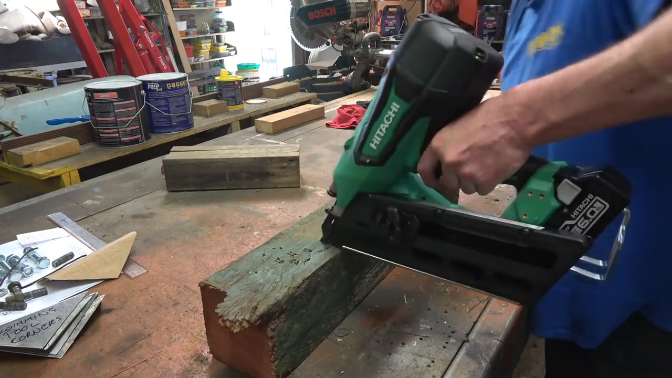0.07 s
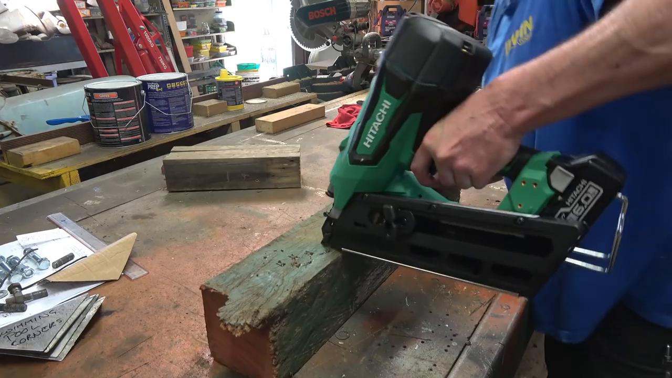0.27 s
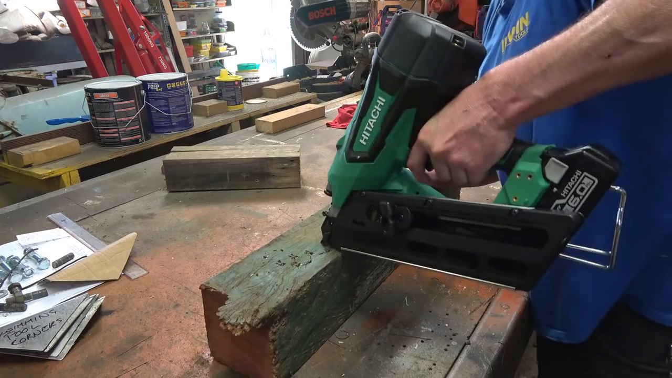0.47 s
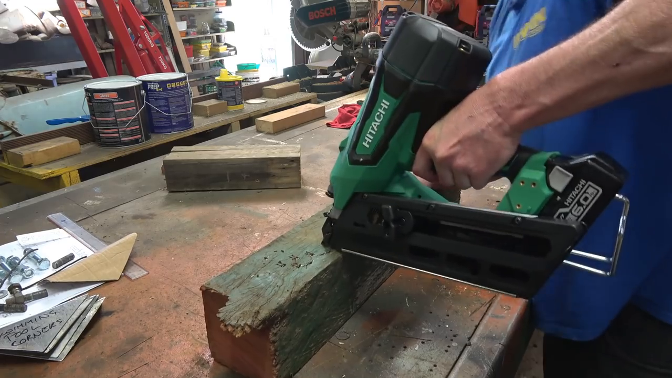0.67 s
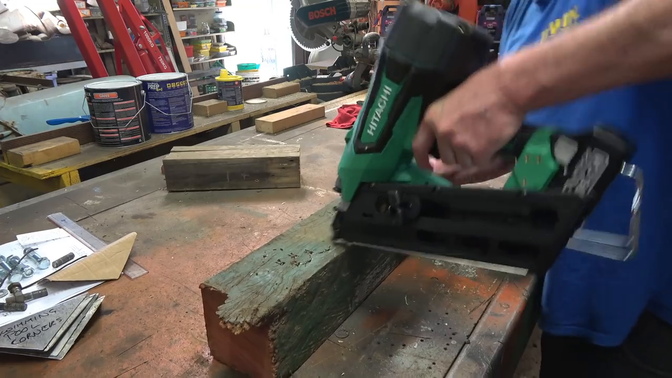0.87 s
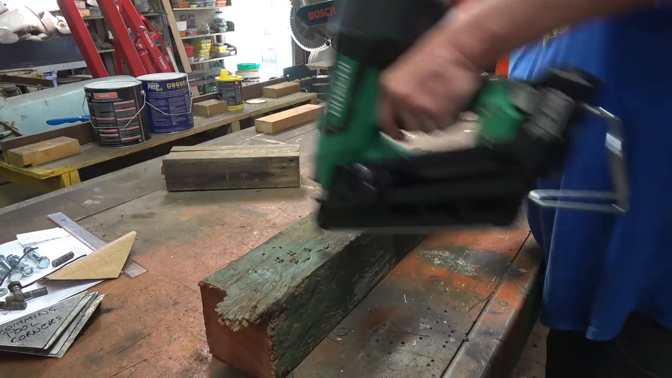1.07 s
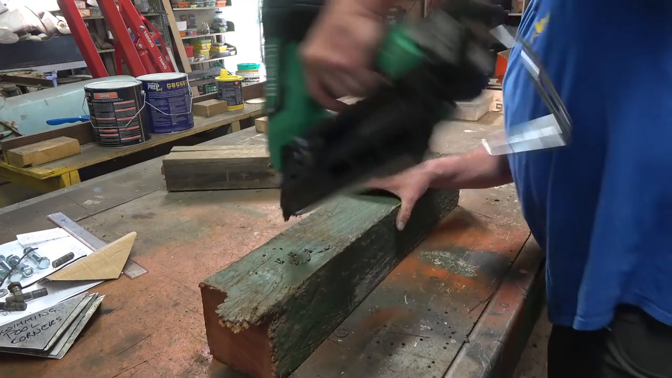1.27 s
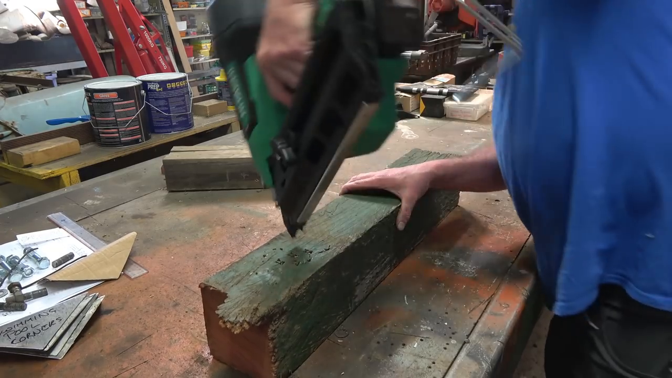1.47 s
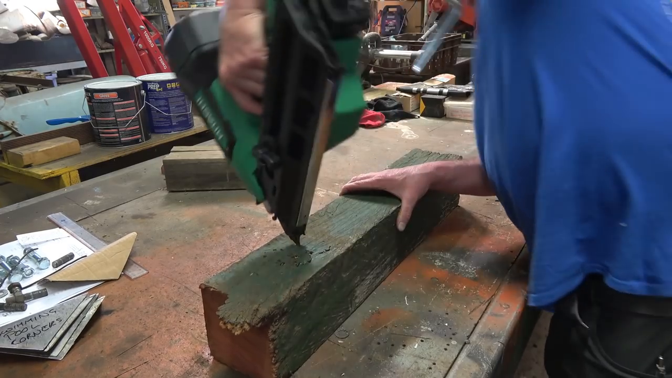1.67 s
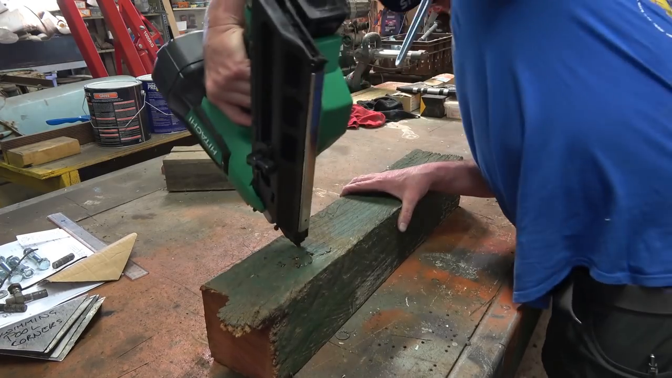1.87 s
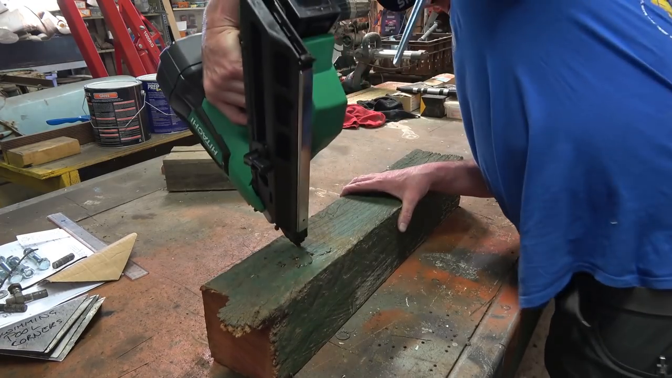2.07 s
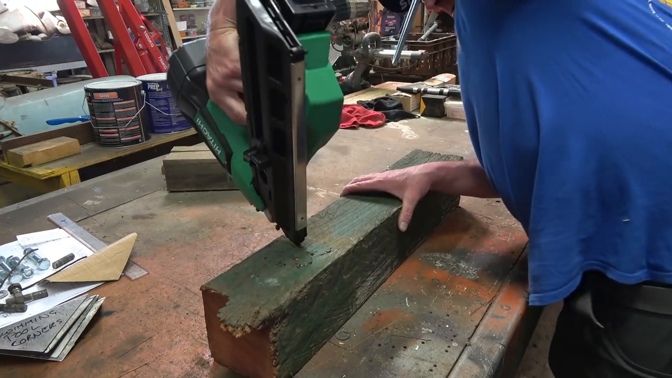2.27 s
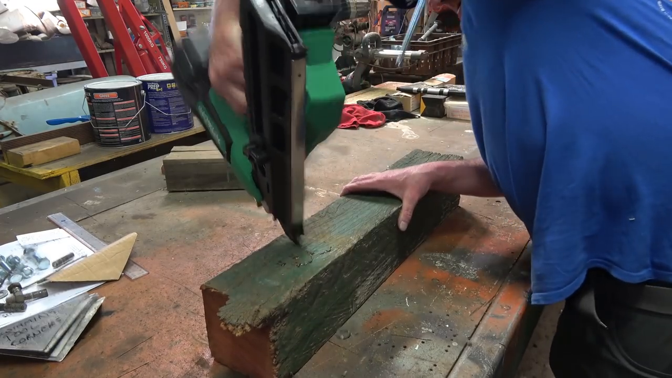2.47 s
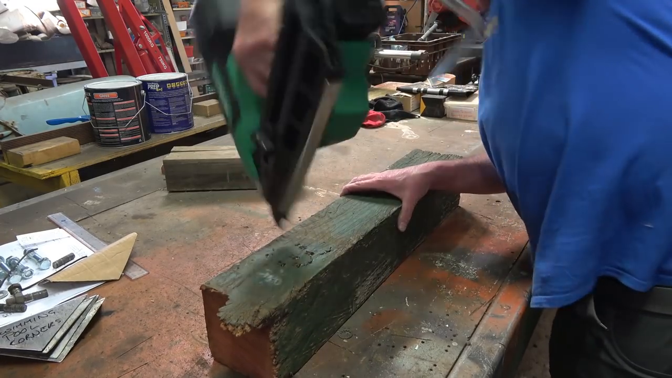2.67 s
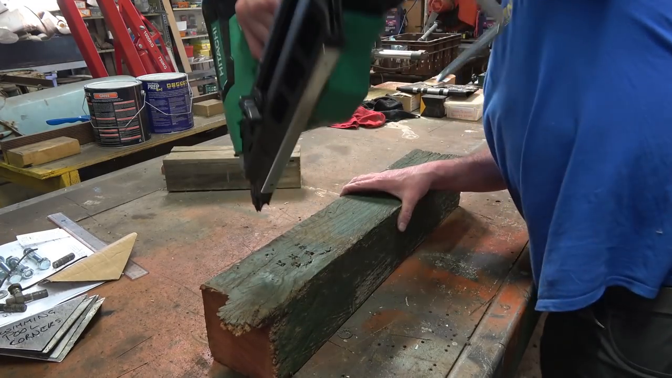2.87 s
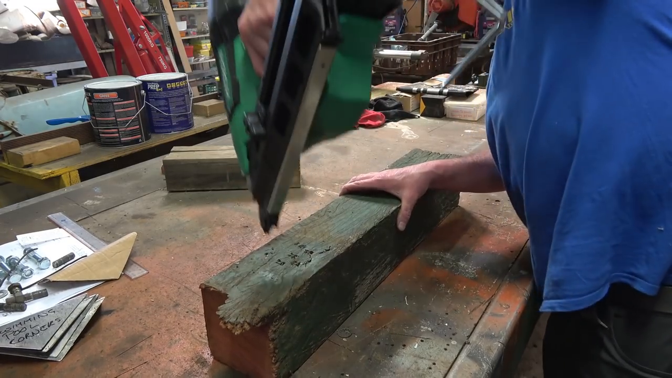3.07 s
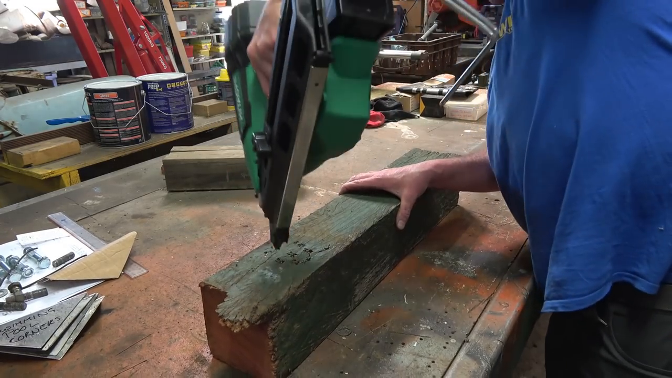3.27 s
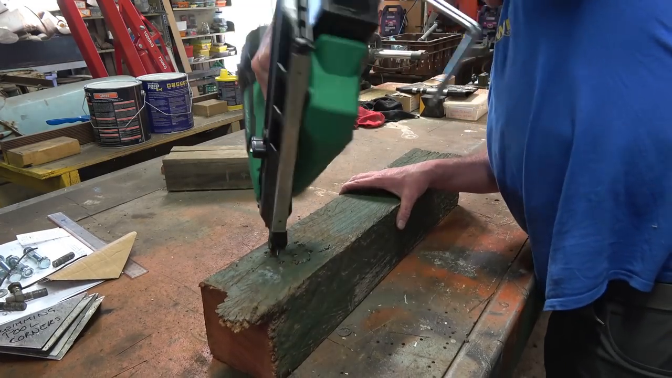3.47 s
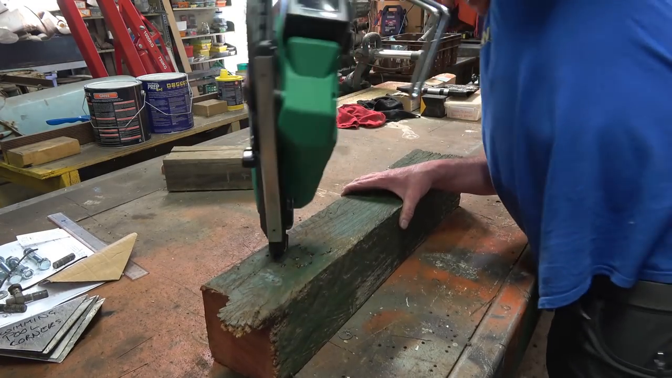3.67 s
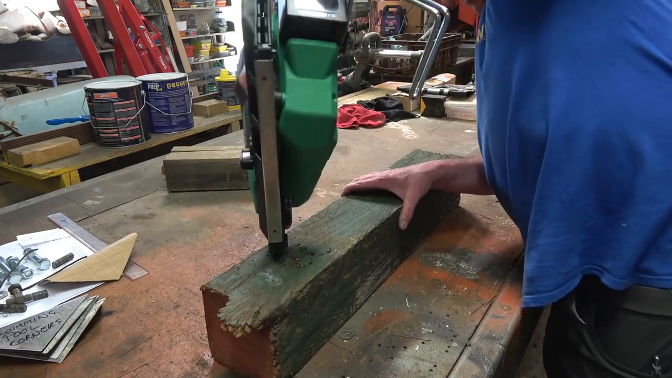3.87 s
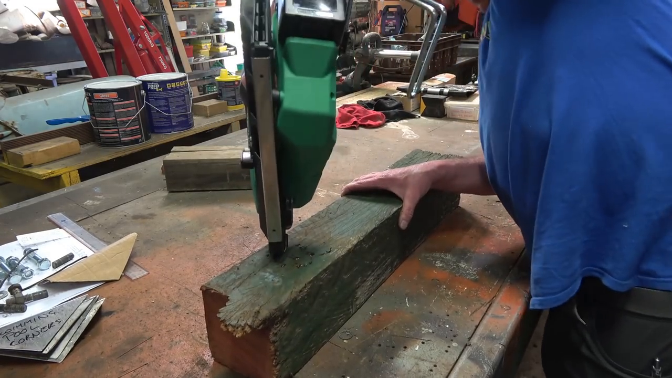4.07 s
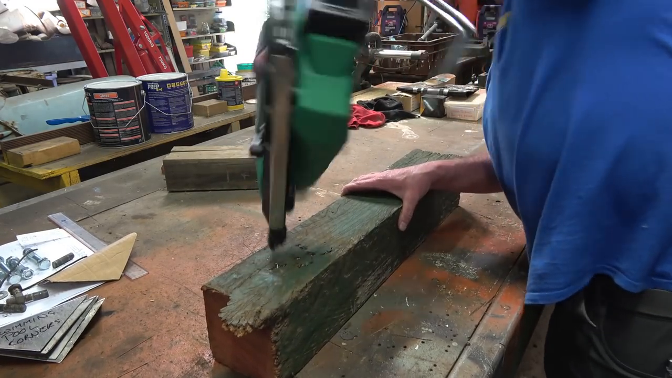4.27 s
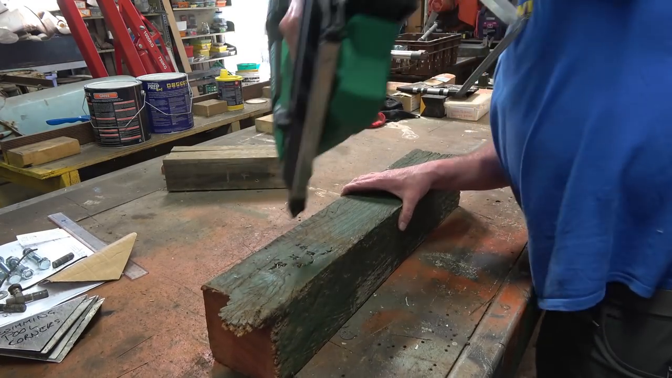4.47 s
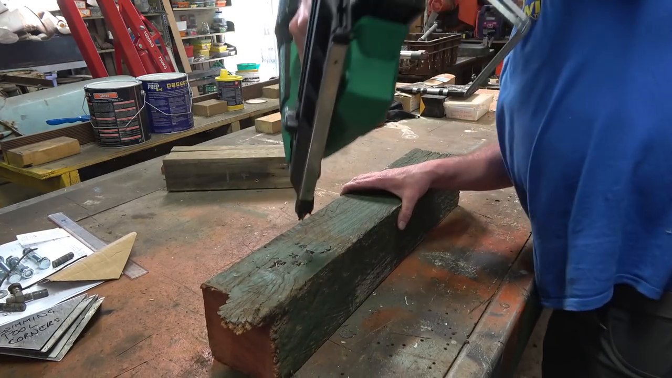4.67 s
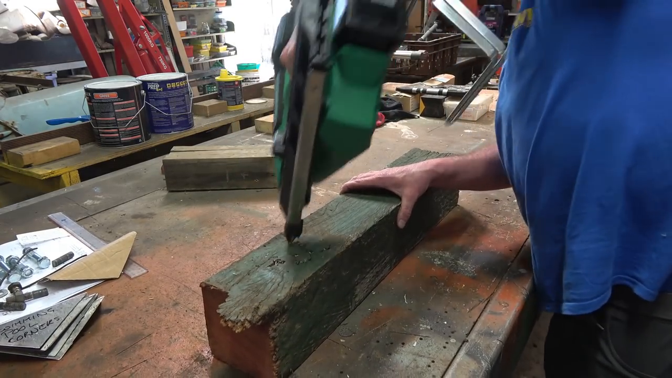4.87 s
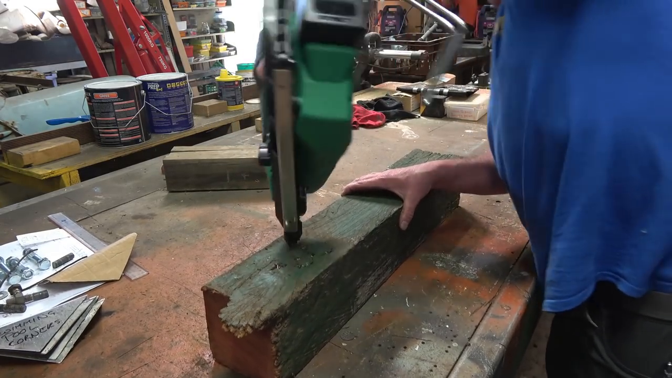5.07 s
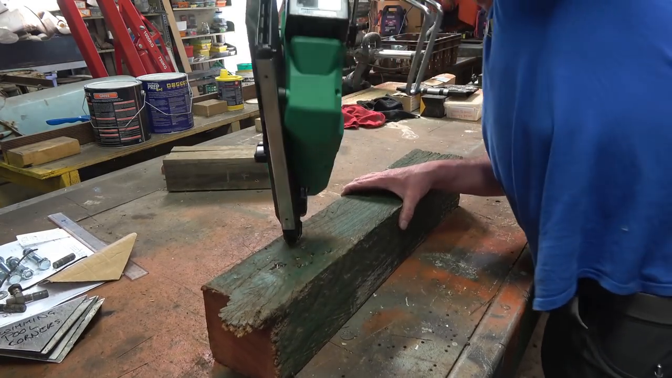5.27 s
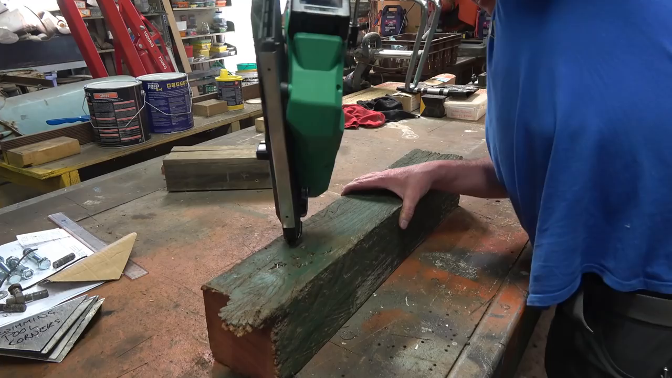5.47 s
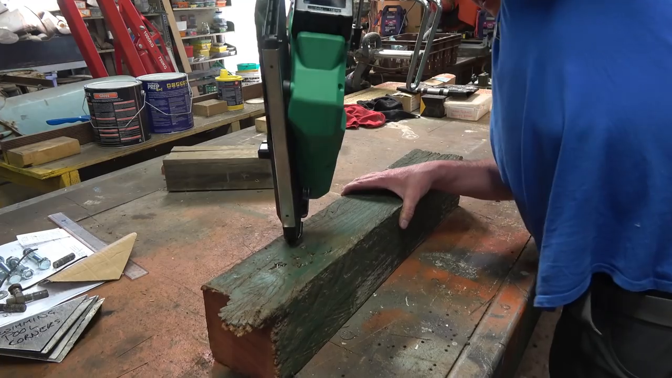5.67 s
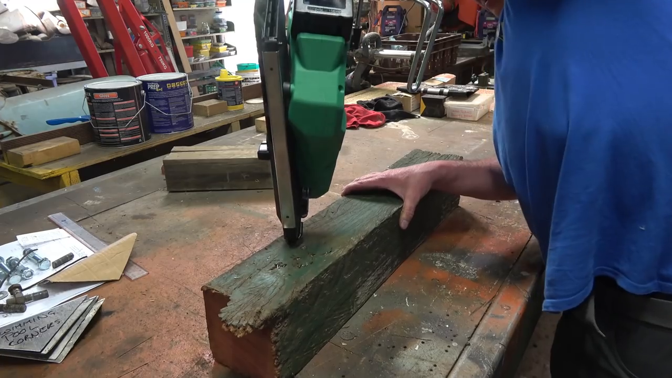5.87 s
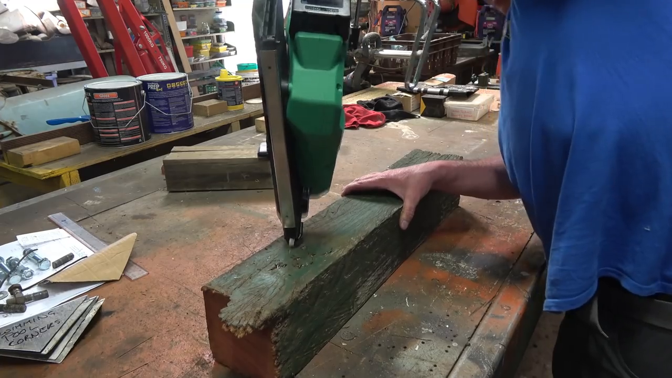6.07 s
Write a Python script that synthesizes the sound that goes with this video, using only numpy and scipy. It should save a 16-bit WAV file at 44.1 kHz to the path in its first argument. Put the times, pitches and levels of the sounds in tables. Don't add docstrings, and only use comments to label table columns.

```python
import sys
import numpy as np
from scipy import signal
from scipy.fft import rfft, irfft
from scipy.io import wavfile
from scipy.ndimage import uniform_filter1d, minimum_filter1d

SR = 44100
rng = np.random.default_rng(int(sys.argv[2]) if len(sys.argv) > 2 else 0)


def pcm_store(signal):
    levels = np.round(np.clip(np.atleast_2d(signal), -1, 1) * 32767)
    wavfile.write(sys.argv[1], SR, levels.astype(np.int16).T)


def undo_db(level):
    steps = np.asarray(level, float) / 20
    return 10 ** steps


N = 270222

# piston release t/s, clang level/dB, clang f/Hz, blow level/dB, motor run/s
SHOTS = [
    (2.3876, 1.5, 2616, 2.5, .417),
    (4.036, 2.5, 2460, 1, .414),
    (6.015, -2.5, 2560, 1, .415),
]
# f/Hz, level/dB, t60/s
BENCH_MODES = [(81.6, -11, .7), (109, 2, .36), (136, 3.5, .26), (160, 1, .3), (187.5, -2.5, .23),
               (224, -5, .25), (259, -6, .25), (317, -7, .22), (432, -12, .35), (636, -6, .4)]
BENCH_TOP_HZ = 107
STROKE_S = .0525


def evened(x):
    return x / np.sqrt(np.mean(x ** 2) + 1e-20)


def read(points, hz):
    f, value = np.transpose(points)
    return np.interp(np.log(hz + 1), np.log(f + 1), value)


def add(mix, s, sound):
    at = round(s * SR)
    sound = sound[max(-at, 0):]
    part = mix[max(at, 0):][:len(sound)]
    part += sound[:len(part)]


def coloured(x, spectrum):
    return irfft(rfft(x) * undo_db(read(spectrum, np.fft.rfftfreq(len(x), 1 / SR))), len(x))


def resonate(x, hz, width_hz):
    turn = np.exp(2j * np.pi * np.cumsum(hz * np.ones(len(x))) / SR)
    r = np.exp(-np.pi * width_hz / SR)
    return 2 * (turn * signal.lfilter([1 - r], [1, -r], x / turn)).real


def ring(modes, t, spread_db):
    hz, db, t60 = np.transpose(modes)[:, :, None]
    chance = rng.standard_normal((2, len(modes), 1))
    level = undo_db(db + spread_db * chance[0] - 60 * t / t60)
    return (level * np.sin(2 * np.pi * hz * (1 + .02 * chance[1]) * t)).sum(0)


def curve(rows):
    s, *columns = np.transpose(rows)
    t = np.arange(s[0], s[-1], 1 / SR)
    return s[0], *(np.interp(t, s, c) for c in columns)


def dying(t, db, t60, rise_s):
    t = np.maximum(t, 0)
    return (undo_db(db - 60 * t / t60) * (1 - np.exp(-(t / rise_s) ** 2))) ** 2


def patchy(x, depth_db):
    z = signal.stft(x, nperseg=256)[2]
    patches = rng.standard_normal(z.shape[::-1])
    patches = uniform_filter1d(uniform_filter1d(patches, 4, 0), 4, 1)
    return evened(signal.istft(z * undo_db(depth_db * evened(patches).T))[1][:len(x)])


def shop(x):
    # f/Hz, t60/s
    decay = [(60, 0.95), (250, 0.38), (1000, 0.52), (2500, 0.63), (6000, 0.56), (10000, 0.26),
             (15000, 0.28)]
    hz, t, z = signal.stft(rng.standard_normal((2, SR)), SR, nperseg=256)
    tail = signal.istft(z * undo_db(-60 * t / read(decay, hz)[:, None]), SR, nperseg=256)[1]
    tail *= np.clip(np.arange(tail.shape[1]) / SR / 0.0098, 0, 1) ** 2
    return signal.fftconvolve(x[None], tail / np.linalg.norm(tail[0]), axes=1)[:, :N]


def hush():
    # f/Hz, level/dB
    spectrum = [(18, -27), (30, 5.5), (659, -6), (953, -4.5), (1030, -7), (1150, -9.5), (2810, -13),
                (3860, -12.5), (14800, -32.5), (16500, -37)]
    return undo_db(-58.5) * np.array([evened(coloured(n, spectrum)) for n in rng.standard_normal((2, N))])


def snaps():
    # t/s, level/dB
    events = [
        (5.514, -46),
        (5.521, -39),
    ]
    out, t = np.zeros(N), np.arange(SR // 2) / SR
    for s, db in events:
        airy = 1.32 * resonate(resonate(rng.standard_normal(len(t)), 9000, 5900), 9000, 9000)
        add(out, s, undo_db(db) * airy * (1.4 * undo_db(-60 * t / 0.0064) + .5 * undo_db(-60 * t / 0.42)))
    return out


def focus_drive():
    # t/s, peak level/dB, f/Hz
    ticks = [(0.3038, -38, 7560), (0.3404, -42, 7240), (0.5921, -45, 7460), (1.1304, -57, 7980),
             (1.9871, -31, 7530), (2.091, -36.5, 10700), (2.169, -44, 10700), (2.2484, -42.5, 10700),
             (2.33, -36.5, 10900), (3.0752, -57, 7220), (3.1716, -49, 7300), (3.27, -46, 7530),
             (3.7762, -42, 14300), (3.7956, -42.5, 7460), (3.919, -45, 7360), (3.9752, -46, 12500),
             (.541, -48, 7500), (.698, -54, 7500), (4.7824, -74, 7540), (5.3657, -49, 10800),
             (5.735, -48, 7800)]
    # start t/s, end t/s, ends f/Hz, top f/Hz, level/dB
    moves = [
        (.17, .46, 12600, 14500, -64),
        (1.973, 2.293, 12600, 14300, -63),
        (3.801, 4.0, 11500, 12250, -62),
    ]
    out, t = np.zeros(N), np.arange(2000) / SR
    for s, db, hz in ticks:
        tick = resonate(rng.standard_normal(len(t)), 9500, 6000) * undo_db(-60 * t / 0.011)
        tone = np.sin(2 * np.pi * hz * t) * undo_db(-60 * t / 0.048)
        add(out, s, undo_db(db) * (.4 * tick + 0.31 * tone))
    for start, end, ends_hz, top_hz, db in moves:
        hz = ends_hz + (top_hz - ends_hz) * np.sin(np.linspace(0, np.pi, round((end - start) * SR)))
        noise = rng.standard_normal(SR // 2)[:len(hz)]
        add(out, start, undo_db(db - 11.5) * evened(resonate(noise, hz, 120)))
    return out


def rubbing():
    # start t/s, end t/s (if before the start, lasts .5 s less the gap), level/dB, start f/Hz, end
    # f/Hz
    whistles = [
        (.22, 0.497, -55, 3900, 3780),
        (5.255, 5.42, -52, 3820, 3780),
        (5.4, 5.47, -54, 3280, 3250),
        (5.85, 5.92, -46, 3770, 3610),
    ]
    lingers = [
        (4.49, 4.85, -48, 4000, 3900),
        (2.86, 3.25, -53, 760, 750),
        (4.52, 4.8, -53, 650, 640),
        (1.05, 1.45, -63, 4000, 3900),
        (2.05, 2.35, -55, 2420, 2400),
        (4.87, 4.98, -40, 2200, 2180),
    ]
    creaks = [(1.715, 1.769, -26, 2150, 2250), (1.705, 1.767, -29, 1100, 1310),
              (1.71, 1.773, -34.5, 650, 680), (1.99, 2.35, -43, 1780, 1714), (2.02, 2.353, -54, 5170, 5120),
              (2.0, 2.343, -55, 2600, 3370), (3.545, 3.598, -28, 1140, 1266),
              (3.545, 3.597, -30.5, 1697, 3040), (3.56, 3.598, -35.5, 3770, 3800),
              (5.245, 5.41, -52.5, 3900, 3830), (5.385, 5.52, -51, 2950, 2850),
              (5.835, 5.93, -47, 3830, 3600), (5.9, 6.005, -49.5, 3300, 3120)]
    rubs = [(0.38, 0.585, -51, 1940, 2400), (.49, 0.501, -35.5, 940, 1200),
            (.725, 0.777, -34.5, 1400, 1150), (0.95, 1.2, -53, 720, 830), (1.97, 1.9, -53, 3700, 6500),
            (4.955, 5.0, -43.5, 1870, 1900), (1.7, 1.772, -37.5, 5000, 7700),
            (3.55, 3.599, -37, 5000, 7500), (5.83, 6.0, -56, 3000, 2500), (5.26, 5, -61, 2800, 2600),
            (5.26, 5.7, -64, 3400, 3200), (.77, .86, -33.5, 1500, 1800), (.51, .62, -48, 1600, 2000)]
    swell, fade, ease = (.3, 0.93), (1, 0.29), (1, 0.58)
    out = np.zeros(N)
    kinds = (whistles, .022, ease), (lingers, .044, fade), (creaks, .17, swell), (rubs, .97, swell)
    for rows, share, ends in kinds:
        for start, end, db, start_hz, end_hz in rows:
            noise = rng.standard_normal(SR // 2)[:round((end - start) * SR)]
            hz = np.linspace(start_hz, end_hz, len(noise))
            width_hz = share * (start_hz + end_hz) / 2
            rub = patchy(resonate(resonate(noise, hz, width_hz), hz, 2 * width_hz), depth_db=0.5)
            shape = signal.windows.tukey(len(rub), .3) * np.linspace(*ends, len(rub))
            add(out, start, undo_db(db) * rub * shape)
    return out


def bench_working():
    # t/s, low creak level/dB, knocking body level/dB, t60/s
    loads = [(0.0, -16.5, -36, 0.47), (.11, -26, -56, 0.39), (.285, -28.5, -52, 0.78),
             (.33, -30, -39, 0.47), (.62, -42.5, -60.5, 1.1), (1.06, -39.5, -52.5, 0.46),
             (.765, -22.5, -23.5, 0.23), (1.509, -27.5, -22.5, 0.64), (1.755, -15.5, -22.5, 0.53),
             (1.97, -43.5, -33.5, 1.3), (2.46, -12.5, -11, 1), (3.36, -25.5, -42, 1.4),
             (3.59, -15.5, -40.5, 0.6), (3.86, -30.5, -53, 1.9), (4.1, -13.5, -14, .75),
             (4.87, -21.5, -33.5, 0.64), (4.98, -24.5, -27, 0.99), (5.5, -44.5, -57, 2.1),
             (5.71, -37.5, -45, 1.04), (5.86, -38.5, -59, 2.6), (6.06, -18.5, -15, 1.6)]
    rise_s, knock_faster, rest_db = 0.017, 1.15, -59
    t, noise = np.arange(N) / SR, rng.standard_normal(N)
    rest = undo_db(2 * rest_db)
    low = np.sqrt(rest + sum(dying(t - s, db, t60, rise_s) for s, db, _, t60 in loads))
    body = np.sqrt(rest + sum(dying(t - s, db, t60 / knock_faster, rise_s) for s, _, db, t60 in loads))
    knocking = patchy(resonate(resonate(noise[::-1], 340, 480), 380, 780), depth_db=3.0)
    creak = undo_db(12) * resonate(noise, BENCH_TOP_HZ, 25)
    creak = creak + sum(undo_db(1.5 * level) * resonate(noise, hz, 50) for hz, level, _ in BENCH_MODES)
    return body * undo_db(-3) * knocking + low * undo_db(-6.5) * evened(creak)


def sways():
    # t/s, peak level/dB, f/Hz, t60/s
    swings = [(.01, -26, 112.9, 0.63), (0.106, -24.5, 114.8, 0.39), (.45, -43, 114, 0.5),
              (.6, -43, 113, 1.1), (0.771, -23, 112, 0.31), (1.53, -26, 110, .6), (1.61, -25, 112.6, 0.43),
              (1.821, -25, 113.4, 0.65), (1.9, -33.5, 112.4, 0.77), (2.03, -38, 112.8, 0.79),
              (2.47, -11.5, 165.3, .25), (2.5, -14, 115.3, 0.53), (2.55, -16, 135.6, 0.78),
              (2.5, -27, 79.9, 0.95), (3.37, -30, 120, .5), (3.43, -28, 115, 0.49),
              (3.61, -22.5, 108.3, 0.39), (3.705, -26.5, 109.4, 0.53), (4.101, -17.5, 107.6, .6),
              (4.15, -13.5, 150.6, 0.46), (4.88, -27, 112.4, 0.45), (5.0, -23, 109.7, 0.55),
              (5.19, -34, 112.1, 0.43), (5.39, -47, 107.2, .6), (5.74, -42, 109, 0.67),
              (5.88, -45, 109.6, 1.4), (.31, -40.5, 251, .4), (1.775, -28, 311, .3), (2.45, -18, 199.6, .4),
              (4.0, -37.5, 110, .8), (5.75, -48, 255, 0.55)]
    out, t = np.zeros(N), np.arange(SR // 2) / SR
    for s, db, hz, t60 in swings:
        level = np.sqrt(dying(t, db, t60, rise_s=0.013))
        add(out, s, level * np.sin(2 * np.pi * hz * t) * np.minimum(10 - 20 * t, 1))
    return out


def boom(db, hz, t, rise_s):
    modes = []
    for f, level, t60 in BENCH_MODES:
        octaves = np.log2(f / hz)
        modes.append((f, level - 9 * octaves ** 2 / (1 + abs(octaves)), t60))
    low = ring(modes + [(hz, 8, .12)], t, spread_db=0.5) * (1 - np.exp(-(t / rise_s) ** 2))
    return -undo_db(db) * low / np.sqrt(np.mean(low[:2000] ** 2))


def pings():
    # t/s, peak level/dB, f/Hz, t60/s
    contacts = [(.0001, -15, 1100, 0.021), (.0060, -12, 6270, 0.012), (.0064, -19, 2700, 0.012),
                (0.018, -7.5, 1905, 0.0094), (.018, -19, 5500, .015), (.5034, -29, 10000, 0.012),
                (0.5073, -13, 2120, 0.0087), (.5085, -22.5, 2740, 0.017), (.7572, -25, 4800, .015),
                (.7662, -10, 2200, 0.023), (0.7672, -9.5, 3000, .02), (0.7674, -15, 5510, .02),
                (.819, -18, 2300, .02), (.8755, -24.5, 2030, 0.017), (1.5224, -5.5, 2097, 0.013),
                (1.522, -9.5, 6530, 0.017), (1.5253, -11, 2700, 0.017), (1.5254, -13, 4930, .015),
                (1.536, -13, 2110, 0.016), (1.6095, -11, 2680, 0.015), (1.633, -24, 6470, 0.014),
                (1.7708, -5.5, 3580, 0.0088), (1.7742, -9.5, 2300, .015), (1.772, -17.5, 8050, 0.018),
                (2.374, -13.5, 2420, .018), (2.381, -19.5, 3980, 0.013), (2.422, -9.5, 4800, .012),
                (3.3637, -17.5, 2200, 0.018), (3.3667, -12.5, 2040, 0.016), (3.3682, -10, 2300, 0.011),
                (3.367, -8, 5290, 0.013), (3.3722, -15, 8600, .012), (3.431, -14.5, 2610, 0.015),
                (3.5967, -10.5, 2750, 0.01), (3.5964, -10.5, 6250, 0.013), (3.599, -8.5, 9940, 0.015),
                (3.599, -15, 8100, 0.019), (4.025, -20, 2200, 0.016), (4.033, -21, 10100, 0.038),
                (4.0715, -5.5, 3850, .015), (4.083, -8, 4330, .012), (4.8605, -9.5, 2270, 0.014),
                (4.863, -16.5, 1150, 0.028), (4.875, -30, 1130, .2), (4.875, -32, 2200, .2),
                (1.633, -21, 8200, 0.011), (4.8613, -10, 6520, 0.016), (4.862, -11, 8720, 0.019),
                (4.865, -10.5, 8100, 0.012), (1.4943, -47, 2200, 0.013), (3.387, -22.5, 1263, 0.052),
                (3.459, -24, 1203, 0.063), (3.4575, -18, 7800, .012)]
    out, t = np.zeros(N), np.arange(3000) / SR
    for s, db, hz, t60 in contacts:
        level = undo_db(db + 3.5 - 60 * t / t60) * (1 - np.exp(-t / 0.00029))
        add(out, s, level * np.sin(2 * np.pi * hz * t))
    return out


def jolt(t, s, t60):
    return np.where(t > s, undo_db(-60 * abs(t - s) / t60), undo_db(-60 * abs(t - s) / 0.0025))


def clack(ring_db, ring_hz, crack_db, t, chatter):
    # f/Hz, level/dB
    spectrum = [(180, -36.5), (300, -16), (531, -6.5), (1170, -2.5), (1550, -1), (2240, 0.5), (3590, -2.5),
                (4930, -6.5), (8580, -4.5), (15200, -21), (16500, -43)]
    # f/Hz, width/Hz, level/dB
    magazine = [(1218, 46, -1.5), (2200, 98, 1.5), (3600, 680, -15.5), (5400, 1000, -3), (7460, 790, -18)]
    noise, share_db = rng.standard_normal((2, len(t))), 2 * rng.standard_normal(len(magazine))
    blow = 0.04 * jolt(t, 0.002, 0.013) + 0.62 * jolt(t, 0.00447, 0.011)
    blow = blow + 0.41 * jolt(t, 0.00628, 0.0073) + 0.33 * jolt(t, .009, 0.0088)
    width_hz = 110 * (ring_hz / 1000) ** 2.2
    tone = resonate(resonate(noise[0] * blow, ring_hz, width_hz), ring_hz, 1700)
    hiss = evened(coloured(noise[1], spectrum))
    body = 0
    for (hz, width_hz, db), share in zip(magazine, share_db):
        body = body + undo_db(db + share + 3.0) * resonate(hiss * blow, hz, width_hz)
    loose = chatter * (jolt(t, 0.0047, 0.12) + 0.52 * jolt(t, 0.012, 0.51))
    crack = hiss * (blow + loose) + body
    return undo_db(ring_db - 6.5) * tone / abs(tone).max() + undo_db(crack_db + 6.0) * crack


def clacks():
    # t/s, ring peak level/dB, ring f/Hz, crack level/dB, boom level/dB
    landings = [
        (-.003, -8, 1100, -10, -32.5),
        (0.006, -28, 2860, -21, -33),
        (1.522, -15, 2100, -9.5, -29),
        (1.7708, -5, 3400, -12.5, -12),
        (4.861, -15.5, 1130, -17.5, -33),
        (4.999, -23, 2120, -18, -17.5),
    ]
    knocks = [(0.018, -8.5, 1250, -16, -21.5), (0.289, -44, 1950, -50, -35.5),
              (0.507, -21, 1900, -36.5, -51), (0.766, -8, 2230, -15.5, -29.5),
              (0.79, -12.5, 1300, -27.5, -41), (0.818, -19, 2440, -30.5, -58),
              (0.876, -23, 2150, -53, -67.5), (1.059, -40, 990, -57, -50), (1.535, -11, 1280, -17, -26),
              (1.61, -14, 2750, -25.5, -33.5), (1.633, -21.5, 1290, -24, -31.5),
              (3.367, -8.5, 1250, -16, -28.5), (3.43, -18.5, 2660, -25, -30.5),
              (3.457, -20, 1183, -27.5, -44), (3.596, -7, 1550, -14, -22.5),
              (3.703, -25.5, 3470, -48, -25.5), (4.885, -14, 1230, -27, -31.5),
              (5.394, -45, 1020, -63, -54.5), (5.726, -58, 1015, -64, -38)]
    # t/s, ring peak level/dB, ring f/Hz, crack level/dB
    clicks = [(.73, -33, 1500, -66), (0.757, -16, 2200, -43), (1.494, -43, 800, -51),
              (2.352, -21, 1900, -50), (2.362, -16.5, 1520, -43), (2.375, -12, 2420, -23.5),
              (2.384, -10.5, 2400, -26), (4.001, -18.5, 1800, -56.5), (4.006, -20, 1900, -41),
              (4.018, -20, 2460, -37), (4.025, -12, 2200, -36.5), (4.031, -14.5, 2480, -23),
              (2.8, -7, 2100, -16), (4.462, -11, 2500, -22.5), (5.117, -50, 7880, -47),
              (5.271, -54.5, 6990, -57), (5.293, -55, 6450, -56), (5.983, -28, 1300, -53),
              (5.999, -20, 2980, -57), (6.008, -9, 2200, -30.5)]
    beam_hz = 161
    out, t = np.zeros(N), np.arange(SR // 2) / SR
    heavy = sorted([(*row, beam_hz) for row in landings] + [(*row, BENCH_TOP_HZ) for row in knocks])
    for s, ring_db, ring_hz, crack_db, boom_db, boom_hz in heavy:
        add(out, s - .004, clack(ring_db, ring_hz, crack_db, t, chatter=0.095))
        add(out, s, boom(boom_db - 0.5, boom_hz, t, rise_s=0.0052))
    for s, *voice in clicks:
        add(out, s - .004, clack(*voice, t[:4000], chatter=0.046))
    return out


def motor():
    # f/Hz, level/dB
    rattle_spectrum = [(710, -25), (1150, -3), (1550, -8), (2250, -3), (3120, -5.5), (4140, -5.5),
                       (5160, -7.5), (8550, -11), (14000, -22), (16000, -28), (16500, -66.5)]
    # f/Hz, level/dB
    rumble_spectrum = [(120, -16.5), (200, -1.5), (395, 0.5), (497, -2), (731, 3.5), (824, 1), (1800, -9.5),
                       (2340, -42), (3960, -120)]
    # f/Hz, width/Hz, level/dB
    panels = [(2900, 570, -10.5), (4800, 330, -21.5), (7800, 350, -15.5), (9200, 230, -21.5)]
    stop_s, stop_db = .026, -8.5
    recoil_s, recoil_db = 0.0055, -3
    out, t = np.zeros(N), np.arange(SR // 2) / SR
    for s, _, _, blow_db, length in SHOTS:
        running = undo_db(stop_db * np.maximum(t - length, 0) / stop_s)
        running = running * np.clip((length + stop_s - t) / .004, 0, 1)
        kick = dying(t, -11.5, 0.64, 0.0015)
        steady = dying(t, -18 + 2.5 * t, 99, .004)
        shaken = dying(t - STROKE_S / 2, -8 + blow_db / 2, 0.45, 0.014)
        rattle = np.sqrt(kick + steady + shaken)
        rumble = np.sqrt(dying(t - STROKE_S, -5.5, 0.56, 0.0014) + dying(t, -29.5, 99, 0.005))
        rattle = rattle * undo_db(recoil_db * np.exp(-((t - STROKE_S + recoil_s / 2) / recoil_s) ** 2))
        noise = rng.standard_normal((3, len(t)))
        bursts_db = 3.33 * evened(uniform_filter1d(uniform_filter1d(noise[2], 90), 90))
        shake = rattle * undo_db(bursts_db) * patchy(coloured(noise[0], rattle_spectrum), depth_db=2.5)
        buzz = sum(undo_db(db) * evened(resonate(noise[1], hz, width_hz)) for hz, width_hz, db in panels)
        shake += rattle * patchy(buzz, depth_db=3.5) * buzz.std()
        shake += rattle * undo_db(-22.5 + 50 * t) * evened(resonate(noise[2], 2500, 120))
        shake += rumble * evened(coloured(noise[1], rumble_spectrum))
        add(out, s, shake * running)
    return out


def whine():
    orders = (20, 19, 10, 38, 57, 80, 76, 95, 114, 23, 11)
    # f/Hz, width below/Hz, width above/Hz, level/dB
    case = [(2383, 55, 72, -10), (2150, 110, 46, -23), (1100, 53, 62, -22), (4050, 200, 180, -21.5),
            (6440, 590, 150, -21.5), (8900, 290, 155, -29), (8100, 300, 300, -34), (10330, 370, 300, -38.5),
            (12340, 400, 300, -36), (2670, 69, 60, -23.5), (1236, 50, 40, -32.5)]
    # t after release/s, speed/(turns/s)
    sag = [(.095, 134), (.115, 130), (.15, 125.6), (.22, 120), (.33, 111.6), (.43, 101.5)]
    # start t/s, trims of mesh/dB, half-mesh/dB, order 38/dB, orders from 57 up and the rest/dB
    windings = [
        (2.399, -1, -1.5, 0, -2.5),
        (4.036, 0.5, -4, -13.5, -1.5),
    ]
    out = np.zeros(N)
    for released, mesh_db, half_db, mid_db, high_db in windings:
        s, hz = curve(sag)
        trims_db = mesh_db, mesh_db, half_db, mid_db, *[high_db] * 7
        wobble = evened(uniform_filter1d(rng.standard_normal((2, SR // 2)), 250))[:, :len(hz)]
        load = np.linspace(0, 1, len(hz)) ** 3
        turns = np.cumsum(hz * (1 + (0.0004 + 0.018 * load) * wobble[0])) / SR
        lines = 0
        for k, (ring_hz, below, above, db), trim_db in zip(orders, case, trims_db):
            off = (k * hz - ring_hz) / np.where(k * hz < ring_hz, below, above)
            level = undo_db(db + trim_db + 4.5) / (1 + off ** 2) ** (0.61 if k < 30 else 1.1)
            lines = lines + level * np.sin(2 * np.pi * k * turns)
        beat = 1 + load * np.cos(2 * np.pi * turns)
        flutter = undo_db(np.linspace(.4, 3.5, len(hz)) * wobble[1])
        add(out, released + s, lines * beat * flutter * signal.windows.tukey(len(hz), .06))
    return out


def shots():
    out, t = np.zeros(N), np.arange(SR // 2) / SR
    for released, clang_db, clang_hz, blow_db, _ in SHOTS:
        struck = released + STROKE_S
        noise = rng.standard_normal((3, len(t)))
        clang = resonate(resonate(noise[0], clang_hz, 230), clang_hz, 900)
        clang = clang * undo_db(-60 * t / 0.092) * (1 - np.exp(-t / 0.01))
        add(out, released, undo_db(clang_db) * clang / clang[:900].std() / 3)
        crack = signal.lfilter([1, -.7], 1, noise[1]) * undo_db(-5.0 - 60 * t / 0.028)
        add(out, struck, undo_db(blow_db) * crack + boom(blow_db - 13.5, 165, t, rise_s=0.0088))
        shudder = evened(resonate(resonate(noise[2], 175, 80), 190, 190))
        hop = undo_db(blow_db - 9.0 - 60 * t / 0.43) * (1 - np.exp(-(t / 0.035) ** 2))
        add(out, struck, hop * shudder)
        add(out, struck + 0.016, undo_db(blow_db - 8.5) * crack)
    return out


def scene():
    # f/Hz, level/dB
    lean = [(60, -1), (99, 3.5), (160, 4.5), (270, 0.5), (450, -3.5), (740, -2), (1220, 0.5), (2010, 1.5),
            (3330, 1.5), (5500, 1.5), (9080, 2), (15000, 2.5)]
    # f/Hz, phase/rad
    lead = [(0, 0.013), (16200, 0.0022)]
    # f/Hz, level/dB
    wide = [(40, -33), (300, -10.5), (1500, -16.5), (3500, -29.5), (5500, -6), (9000, 0.5), (11500, 1),
            (16000, -35.5)]
    contacts, lines = pings(), whine()
    tool = clacks() + shots() + motor() + sways() + rubbing() + bench_working()
    wet, other = shop(tool + .25 * contacts + .45 * lines)
    floor = hush()
    mid = undo_db(-4.0) * (tool + contacts + lines) + undo_db(-13.5) * wet
    mid = mid + focus_drive() + snaps() + floor[0]
    side = coloured(0.15 * other + floor[1], wide)
    hz = np.fft.rfftfreq(N, 1 / SR)
    ports = undo_db(read(lean, hz) / 2) * np.exp(.5j * read(lead, hz))
    return np.array([irfft(rfft(mid) * ports, N) + side, irfft(rfft(mid) / ports, N) - side])


def low_pass(x):
    return signal.sosfilt(signal.butter(12, 16650, fs=SR, output="sos"), x)


def record(dry):
    # f/Hz, level/dB
    microphone = [(20, -14), (35, 2.5), (55, 2), (75, 3.5), (12000, 1.5), (15000, -1), (16000, -12.5),
                  (16500, -24.5)]
    peak_db = 20 * np.log10(-minimum_filter1d(-abs(dry).max(0), 61) + 1e-9)
    fall_db = np.arange(N) * 85.0 / SR
    over_db = np.maximum(np.maximum.accumulate(peak_db + fall_db) - fall_db + 1.5, 0)
    held = np.clip(dry / undo_db(uniform_filter1d(over_db, 60)), -1, 1)
    padded = np.pad(held, ((0, 0), (0, SR // 4)))
    held = np.array([coloured(port, microphone)[:N] for port in padded])
    hiss = resonate(resonate(rng.standard_normal(N), 12500, 4000), 12500, 4000)
    return low_pass(held + undo_db(-72.0) * hiss)


dry = scene()
out = record(dry)
pcm_store(out)
```